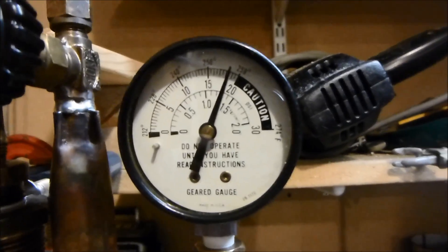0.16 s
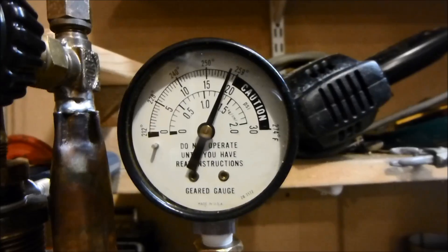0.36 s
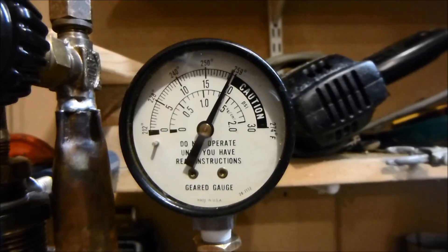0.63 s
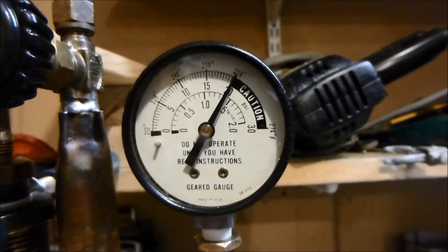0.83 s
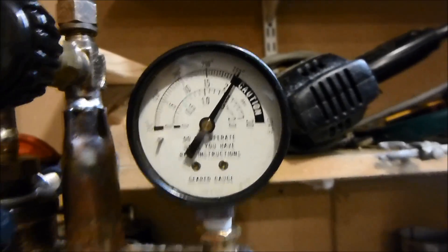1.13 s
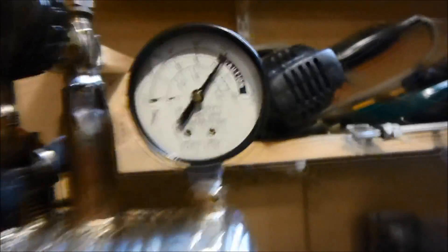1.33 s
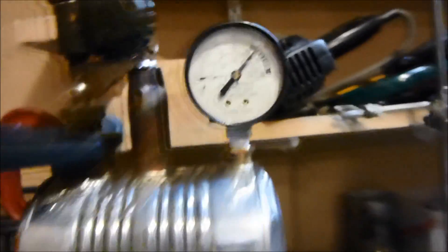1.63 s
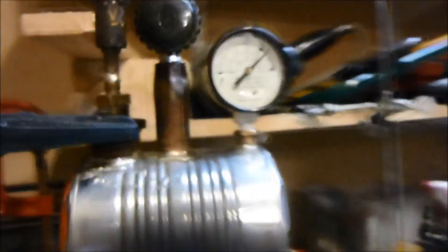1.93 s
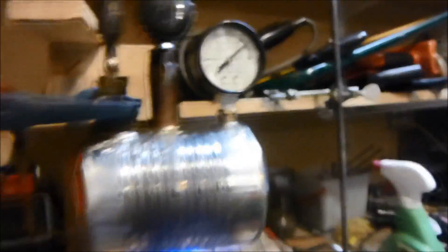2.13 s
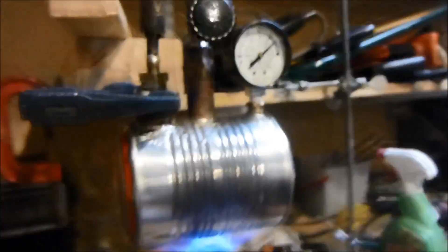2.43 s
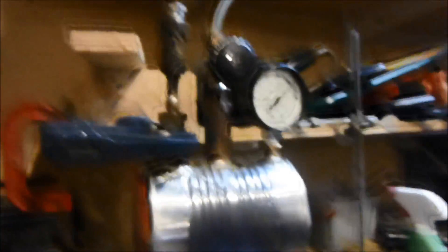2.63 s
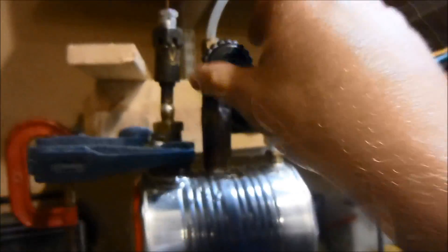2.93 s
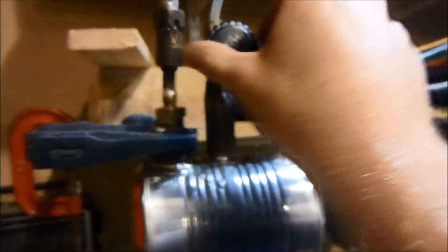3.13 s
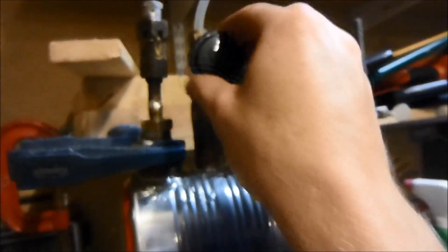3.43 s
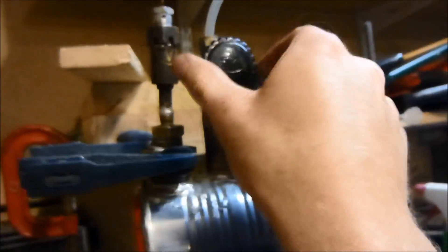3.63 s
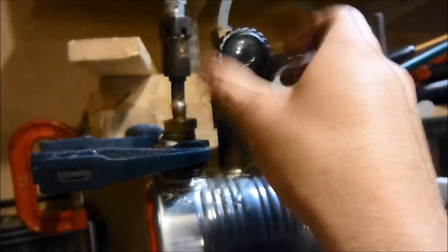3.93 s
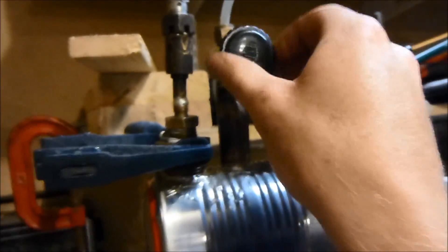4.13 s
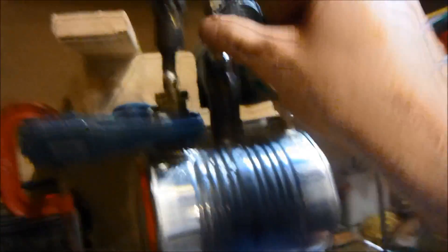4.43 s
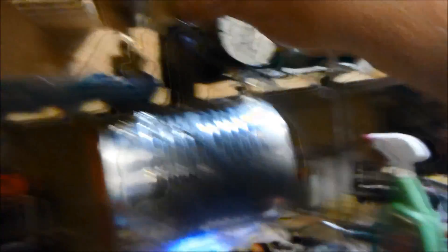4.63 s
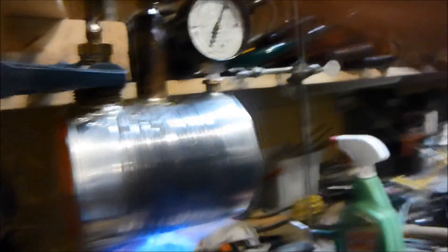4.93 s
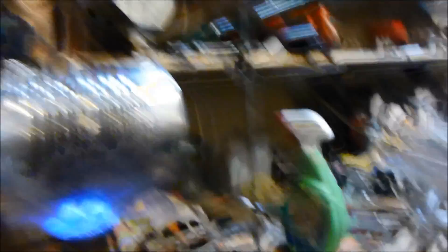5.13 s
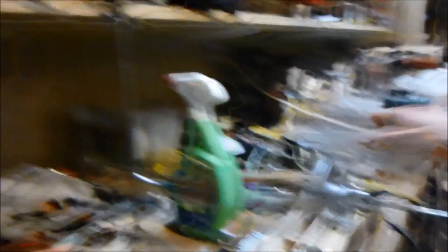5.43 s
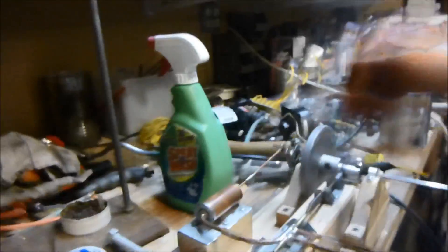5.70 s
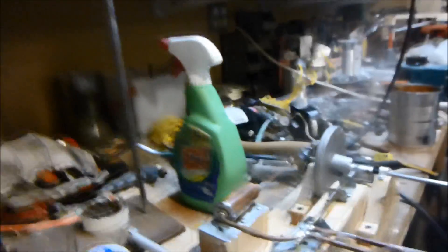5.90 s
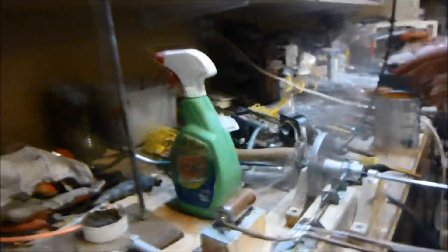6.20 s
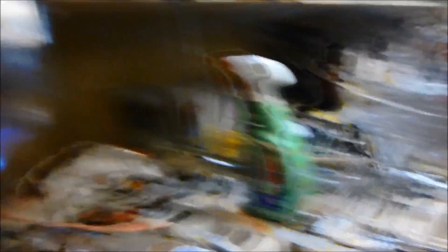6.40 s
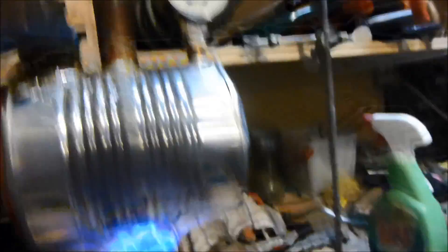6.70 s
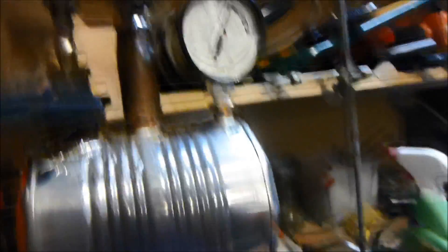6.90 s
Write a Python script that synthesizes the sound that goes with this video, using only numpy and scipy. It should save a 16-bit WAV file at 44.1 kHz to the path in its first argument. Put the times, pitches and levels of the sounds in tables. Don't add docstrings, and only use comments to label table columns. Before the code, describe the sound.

Close handheld stereo sound at a bench: the tail of a steam release stops with a sharp metallic snap. A gas flame hisses, flutters and pops, growing louder. A spring valve ticks, bursts open with bright wet steam, holds nearly a second, then shuts abruptly. After a quieter flame passage, leaking steam rises and a tiny piston engine chuffs, each turn with a breathy sliding whistle, ever faster.

```python
import sys
import numpy as np
from scipy import signal
from scipy.fft import rfft, irfft, next_fast_len
from scipy.io import wavfile
from scipy.ndimage import uniform_filter1d

SR = 44100
rng = np.random.default_rng(int(sys.argv[2]) if len(sys.argv) > 2 else 0)


def bounce(signal):
    frames = np.transpose(np.atleast_2d(signal))
    limited = np.clip(frames, -1, 1)
    pcm = np.round(limited * 32767).astype(np.int16)
    wavfile.write(sys.argv[1], SR, pcm)


def boost(x):
    u = np.asarray(x, float) / 20
    return 10 ** u


N = 311346
SIZE = next_fast_len(N)
HZ = np.arange(SIZE // 2 + 1) * SR / SIZE + 1e-3
TIME = np.arange(N) / SR

# (time [s], level [dB], left-right [dB], treble [dB])
HISS_CURVE = [(0.12, -42.5, 3.5, 5.5), (0.3, -42, 5, -5), (0.85, -38.5, 5.5, -1), (1.75, -36, 4, -1),
              (2.3, -35, 3.5, 5.5), (2.625, -29, 3, 2), (2.66, -41.5, -12, 6), (3.5, -41.5, -2, 10),
              (3.7, -46, 2.5, 1), (4.06, -42.5, 1, -1), (4.2, -40, 1, 2.5), (4.65, -37.5, 1.5, 0.5),
              (5.16, -38.5, 4, 4), (5.4, -39, 6, 6), (5.7, -39, 5, 6.5), (6.3, -40.5, 8, 0),
              (6.8, -34, 3, -2), (7.06, -35, 3, -20)]
# (frequency [Hz], density [dB per Hz])
HISS_SPECTRUM = [(650, -46), (1100, -26), (2020, -18.5), (2940, -11), (3430, -14.5), (4050, -8),
                 (4420, -10.5), (5220, 1.5), (6160, -1.5), (7270, -7), (10300, -14.5), (12900, -10),
                 (15400, -14)]
# (frequency [Hz], width [Hz], level [dB])
NOZZLE_BANDS = [(3007, 220, -28), (4107, 75, -22), (5154, 105, -11.5)]
# (frequency [Hz], width [Hz], level [dB])
WEEP_BANDS = [(6320, 220, -11), (8300, 500, -15.5), (12740, 550, -16.5)]
# (time [s], pitch factor [1], level [dB])
WEEP_CURVE = [(0.2, .92, -4), (1.0, .96, -3), (1.45, .95, -2), (1.65, 1.03, 2), (1.95, 1.06, 4),
              (2.3, .96, 3), (2.6, .94, 3), (3.7, .93, -7), (4.3, .96, -6), (4.8, 1.0, -3), (5.2, 1.05, 1),
              (5.6, 1.0, -4), (7.06, .98, -5)]
# (time [s], lag [ms], level [dB])
SHELL_ECHO_CURVE = [(1.3, 1.5, -30), (1.42, 1.35, -11), (1.8, .95, -11), (2.05, .88, -12), (2.4, 1.0, -30)]
# (time [s], gain [dB])
GAS_GUSTS = [(.22, 0.5), (0.35, 2.5), (0.43, 0.5), (0.58, 1.5), (0.7, 2), (0.88, -1), (1.0, 1), (1.08, 2),
             (1.25, 1), (1.33, 2), (1.45, 2.5), (1.56, 2), (1.7, 3.5), (1.77, 4), (2.0, 0), (4.2, 0.5),
             (4.5, 1), (4.8, -0.5), (5.16, 2.5)]
# (frequency [Hz], left-right likeness [1])
BURNER_STEREO = [(60, 0.4), (130, 0.9), (290, 0.93), (640, 0.63), (1410, 0.44), (3100, 0.58), (6820, 0.94),
                 (15000, 0.16)]
# (time [s], roar level [dB])
ROAR_CURVE = [(0.0, -60), (0.14, -58), (0.9, -52), (1.7, -51.5), (2.4, -45.5), (2.6, -43.5), (2.71, -50.5),
              (3.4, -49), (3.56, -57), (3.85, -54), (4.78, -52.5), (5.15, -45.5), (5.56, -46.5),
              (5.68, -45.5), (6.4, -42), (6.55, -45.5), (7.06, -41)]
# (frequency [Hz], density [dB per Hz])
ROAR_SPECTRUM = [(68, -73), (115, -5.5), (157, -3.5), (275, -1), (358, -2.5), (446, -14), (498, -6),
                 (550, -13), (922, -10.5), (1140, -14.5), (1600, -14.5), (2080, -17.5), (3520, -120)]
# (frequency [Hz], density [dB per Hz])
FLUTTER_SPECTRUM = [(45, -10), (70, -15), (100, 3), (125, 6), (180, -43)]
# (time [s], peak [dB], brightness [dB])
IGNITIONS = [(0.137, -38.5, -4), (0.225, -48, -1), (0.299, -37, -10.5), (0.537, -32, -8), (0.655, -44, -17),
             (0.699, -35.5, -20), (0.751, -30, -7), (0.831, -33.5, -10), (0.876, -33.5, -8),
             (0.909, -34, -10), (0.97, -36, -24), (1.038, -38, -19), (1.11, -35, -7.5), (1.182, -29.5, -13),
             (1.285, -31, -13), (1.33, -35, -10), (1.393, -37, -7), (1.493, -22.5, -10), (1.55, -36, -5),
             (1.65, -31.5, -1), (1.71, -23, -9), (1.81, -45, 1), (1.942, -42, -16), (2.019, -52, -14),
             (2.081, -28, -9.5), (2.156, -25.5, -3.5), (2.219, -29, -6.5), (2.39, -42, 0),
             (2.482, -26, -8.5), (2.533, -30.5, -2.5), (2.627, -40, -2), (2.79, -42, -2), (3.114, -32.5, 0),
             (3.528, -30.5, -13), (3.818, -34, -13), (3.887, -34, -7), (4.141, -42.5, -1.5),
             (4.356, -37, -18), (4.51, -31, -14), (4.71, -40, -11), (4.841, -39, -1), (4.968, -24, -10.5),
             (5.06, -35, -3), (5.169, -23, -20), (5.301, -26.5, -13), (5.428, -30, -9), (5.501, -33.5, -13),
             (5.57, -34, -15), (5.65, -28.5, -11), (5.847, -30.5, -6), (5.912, -37, -14), (5.964, -42, -17),
             (6.176, -24, -9.5), (6.341, -33, -21), (6.446, -21, -21), (6.574, -40, -8), (6.791, -36, -6),
             (6.936, -40, 0), (6.988, -37, -19)]
# (time [s], peak [dB], brightness [dB])
OPENING_POP = (0.00094, -29, -30)
# (frequency [Hz], width [Hz], level [dB])
FIREBOX_MODES = [
    [(164, 116, -5), (276, 93, 0)],
    [(620, 118, -4.5), (920, 220, -7)],
]

# (time [s], jet level [dB])
VALVE_OPENING = [
    (1.702, -66),
    (2.29, -41),
    (2.33, -34),
    (2.5, -35),
    (2.627, -26),
    (2.636, -19.5),
    (2.65, -21),
]
# (time [s], jet level [dB])
VALVE_BLOWING = [(2.69, -24.5), (2.808, -22.5), (2.862, -22), (2.918, -21.5), (2.954, -21), (2.966, -25),
                 (3.048, -22), (3.106, -23.5), (3.178, -21), (3.284, -23), (3.34, -22), (3.456, -22),
                 (3.504, -22)]
# (time [s], jet level before [dB])
VALVE_SHUTTING = [
    (0.026, -22.5),
    (3.542, -21),
]
# (frequency [Hz], density [dB per Hz])
JET_SPECTRUM = [(180, -51), (300, -20), (1030, -16.5), (2100, -21), (2900, -20.5), (3500, -16.5),
                (3900, -12), (4150, -12.5), (4450, -14.5), (4950, -4.5), (5950, -5), (7450, -13.5),
                (14200, -1.5), (15000, -1), (15500, -10)]
# (frequency [Hz], left-right likeness [1])
JET_STEREO = [(60, 0.54), (130, 0.94), (290, 0.19), (640, -0.18), (1410, -0.53), (3100, 0.54), (6820, 0.89),
              (15000, 0.71)]
# (time [s], frequency [Hz], level over jet [dB])
SHRIEK_CURVE = [(2.64, 12800, -6), (2.8, 13000, -14), (2.94, 13000, -3), (2.98, 14500, -19),
                (3.2, 14600, -10), (3.55, 13860, -18)]
# (time [s], peak [dB])
SEAT_HITS = [
    (0.0044, -6.5),
    (0.0202, -14),
    (.716, -26),
    (2.342, -15),
    (2.6298, -5),
    (2.633, -9),
    (2.637, -6.5),
    (2.644, -10),
    (2.654, -10),
    (2.7978, -11),
]
# (frequency [Hz], density [dB per Hz])
SLAM_SPECTRUM = [(60, -45), (130, 1), (300, -15), (900, -15), (2000, -16), (3300, -10.5), (5500, 0),
                 (8000, -7), (13500, -0.5), (15000, 3), (16000, -10)]
# (time [s], low mode [dB], high mode [dB])
DISC_BOUNCES = [
    (3.5306, -23, -22),
    (3.533, -16.5, -31),
    (3.5397, -18, -15),
]
# (time [s], depth [dB])
NOTCH_DEPTH = [(2.66, 0), (2.72, 11), (2.9, 21), (3.55, 24), (3.65, 4), (5.0, 3), (5.6, 0)]

# (time [s], valve gear leak [dB], steady exhaust [dB])
ENGINE_CURVE = [(4.1, -47, -75), (4.9, -41.5, -75), (5.2, -45, -75), (5.32, -43, -66), (5.44, -41, -68),
                (5.5, -35, -65), (5.69, -31, -59), (5.73, -29.5, -47), (5.82, -31.5, -42),
                (6.0, -32.5, -49), (6.15, -32, -39.5), (6.5, -37, -39), (7.06, -81, -36)]
# (frequency [Hz], density [dB per Hz])
EXHAUST_SPECTRUM = [(530, -30), (900, -11), (1570, -5.5), (1880, -8.5), (2170, -8.5), (3290, -9.5),
                    (4070, -3.5), (4420, -10.5), (5480, 0), (8200, -3.5), (13700, -2), (15400, -5)]
# (frequency [Hz], density [dB per Hz])
LEAK_SPECTRUM = [(1470, -53), (2500, -15.5), (4070, -8), (4630, -3.5), (5230, -5), (6570, -7), (13200, 4.5),
                 (15400, -0.5)]
# (frequency [Hz], left-right likeness [1])
ENGINE_STEREO = [(60, 0.71), (130, 0.91), (290, 0.91), (640, 0.79), (1410, 0.66), (3100, 0.22), (6820, 0.6),
                 (15000, 0.64)]
# (exhaust opens [s], puff [dB], whistle [dB])
EXHAUST_TURNS = [
    (5.708, -30, -43.5),
    (6.151, -28.5, -42),
    (6.328, -29, -42),
    (6.465, -29, -52),
    (6.588, -29, -42.5),
    (6.697, -30, -43),
    (6.806, -29.5, -41),
    (6.907, -32, -48),
    (7.003, -34, -50),
]
# (time [s], crank angle [turns])
FIRST_TURN_CRANK = [(5.708, .2), (5.76, .33), (5.83, .38), (5.875, .47), (6.0, 0.55), (6.04, .64),
                    (6.066, .67), (6.085, .74), (6.105, .78)]
PISTON_SWEEP = [(.5, .5), (.57, .57), (.71, .78)]
# (crank angle [turns], level [dB])
FIRST_STROKE_SONG = [(.2, -5), (.33, 1), (.44, 1), (.5, 2), (.54, -6), (.62, 1), (.68, 1), (.8, -4),
                     (1, -3), (1.2, 0), (2, -1), (2.2, 1)]

# (frequency [Hz], density [dB per Hz])
RUMBLE_SPECTRUM = [(12, -30), (20, 8), (25, -11), (32, -24), (48, -25), (64, -26), (83, -52), (140, -120)]


def rms_one(x):
    return x / np.sqrt(np.mean(x ** 2) + 1e-20)


def in_time(rows):
    s, *columns = np.transpose(rows)
    return [np.interp(TIME, s, c) for c in columns]


def at_hz(points, hz):
    table_hz, value = np.transpose(points)
    return np.interp(np.log(hz), np.log(table_hz), value)


def drift(rate_hz):
    r = np.exp(-16 * np.pi * rate_hz / SR)
    slow = signal.lfilter([1], [1, -2 * r, r * r], rng.standard_normal(N // 8 + 9002))[9000:]
    return np.interp(np.arange(N) / 8, np.arange(len(slow)), rms_one(slow))


def bursts(times_s, levels_db, rise_s, t60_s):
    out = np.zeros(N)
    for s, db, long_s in zip(times_s, levels_db, np.broadcast_to(t60_s, len(times_s))):
        span = slice(round(s * SR), round((s + long_s) * SR))
        age_s = TIME[span] - s
        out[span] += boost(db - 60 * age_s / long_s) * np.clip(age_s / rise_s, 0, 1)
    return out


def resonate(x, modes):
    out = 0
    for k, (hz, width_hz, db) in enumerate(modes):
        r = np.exp(-np.pi * width_hz / SR)
        poles = [1, -2 * r * np.cos(2 * np.pi * hz / SR), r * r]
        out = out + (-1) ** k * boost(db) * signal.lfilter([1 - r * r, 0, r * r - 1], poles, x + 1e-18)
    return out


def filtered(x, order, hz, kind):
    return signal.sosfilt(signal.butter(order, hz, kind, fs=SR, output="sos"), x)


def narrow_noise(centre_hz, width_hz, steady=0):
    breath = drift(width_hz) + 1j * drift(width_hz)
    breath = breath * (np.sqrt(2) / np.abs(breath)) ** steady
    return np.real(breath * np.exp(2j * np.pi * np.cumsum(centre_hz) / SR))


def turbulence(spectrum, likeness, surge_db, patchy_db, spit_db, ref_hz, lag_s=0):
    grain = boost(surge_db * (drift(3.4) + 0.52 * drift(28)) + spit_db * drift(450))
    mid, side = rfft(rng.standard_normal((2, SIZE))[:, :N] * grain, SIZE)
    alike = np.clip(at_hz(likeness, HZ), -1, 1)
    pair = np.sqrt(1 + alike) * mid + np.sqrt(1 - alike) * side * [[1], [-1]]
    pair = pair * boost(at_hz(spectrum, HZ)) * np.exp(1j * np.pi * HZ * lag_s * np.array([[1], [-1]]))
    lags_s = .002 + .012 * rng.random(6)
    pair = pair * (1 + boost(-15) * sum(np.exp(-2j * np.pi * HZ * lag) for lag in lags_s))
    inside = (HZ > ref_hz[0]) & (HZ < ref_hz[1])
    power = np.sum(np.abs(pair.mean(axis=0)[inside]) ** 2)
    pair = pair * SIZE / np.sqrt(2 * SIZE / N * power)
    half_octave = 2 * np.log2(HZ)
    lowest, highest = np.floor(2 * np.log2(spectrum[0][0])), 2 * np.log2(spectrum[-1][0])
    out, near = 0, drift(2)
    for centre in np.arange(lowest, highest + 1):
        share = np.clip(1 - np.abs(half_octave - centre), 0, 1)
        near = .7 * near + .7 * drift(2)
        out = out + boost(patchy_db * (near + drift(18.6))) * irfft(pair * share, SIZE)[:, :N]
    return out


def panned(x, pan_db):
    return x * boost(np.array([[.5], [-.5]]) * pan_db)


def gas_hiss():
    level_db, pan_db, treble_db = in_time(HISS_CURVE)
    hiss = turbulence(HISS_SPECTRUM, BURNER_STEREO, surge_db=1.1, patchy_db=.5, spit_db=0.0,
                      ref_hz=(4500, 7000), lag_s=5e-6)
    band_hz = np.where(TIME < 5.3, 5960, 5580) * (1 + 0.017 * drift(1.4))
    hiss = hiss + boost(-12.5 + 2 * drift(4.9)) * narrow_noise(band_hz, width_hz=96)
    for hz, width_hz, db in NOZZLE_BANDS:
        hiss = hiss + boost(db + 2.0 * drift(4.0)) * narrow_noise(hz * (1 + .018 * drift(.7)), width_hz)
    factor, weep_db = in_time(WEEP_CURVE)
    for hz, width_hz, db in WEEP_BANDS:
        hiss = hiss + boost(db + weep_db) * narrow_noise(hz * factor, width_hz)
    treble = signal.sosfiltfilt(signal.butter(3, 8500, "high", fs=SR, output="sos"), hiss)
    hiss = hiss + (boost(treble_db) - 1) * treble
    lag_ms, echo_db = in_time(SHELL_ECHO_CURVE)
    echo = np.array([np.interp(TIME - lag_ms / 1000, TIME, ear) for ear in hiss])
    hiss = (hiss + boost(echo_db) * echo) / np.sqrt(1 + boost(2 * echo_db))
    gust_s = 0.025
    level_db = level_db + sum(db * np.exp(-.5 * ((TIME - s) / gust_s) ** 2) for s, db in GAS_GUSTS)
    return panned(boost(level_db) * hiss, pan_db)


def late_ignitions(roar_db):
    luck = rng.random((120, 3))
    small_s = np.cumsum(.11 * (0.22 + 1.4 * luck[:, 0]))
    small_db = np.interp(small_s, TIME, roar_db) + 11.5 - 9.0 * luck[:, 1]
    small = np.c_[small_s, small_db, -2.5 - 13 * luck[:, 2]]
    return np.vstack([[OPENING_POP], IGNITIONS, small[small_s < TIME[-1]]]).T


def flame_roar(roar_db, pops):
    s, peak_db, bright_db = pops
    blowing = (TIME > VALVE_OPENING[-1][0] + .02) & (TIME < VALVE_SHUTTING[-1][0])
    choke_db = -23 * uniform_filter1d(1. * blowing, size=4000)
    mean_db = roar_db.mean()
    flutter_db = mean_db + 0.31 * (roar_db - mean_db) - 17.5 + 3.5 * drift(9.9) + choke_db
    roar = turbulence(ROAR_SPECTRUM, BURNER_STEREO, surge_db=2.5, patchy_db=1.0, spit_db=2.0, ref_hz=(120, 450))
    flutter = turbulence(FLUTTER_SPECTRUM, BURNER_STEREO, surge_db=2.0, patchy_db=-1.0, spit_db=3.5,
                         ref_hz=(60, 115))
    thumps = bursts(s, peak_db + bright_db - 22.5, rise_s=0.0099, t60_s=.14)
    return boost(roar_db) * roar + (boost(flutter_db) + thumps * ~blowing) * flutter


def flame_pops(pops):
    s, peak_db, bright_db = pops
    puff = rng.standard_normal(N) + 0.31 * rng.standard_normal((2, N))
    puff = filtered(puff, 2, 110, "high")
    dull_modes, bright_modes = FIREBOX_MODES
    dull = resonate(puff * bursts(s, peak_db + 10.5, rise_s=0.0051, t60_s=.08), dull_modes)
    bright_puff = puff * bursts(s, peak_db + bright_db + 13.5, rise_s=0.0061, t60_s=.1144)
    return dull + resonate(bright_puff, bright_modes)


def burner():
    roar_db, = in_time(ROAR_CURVE)
    pops = late_ignitions(roar_db)
    return gas_hiss() + flame_roar(roar_db, pops) + flame_pops(pops)


def snap(s, db):
    return [(s, db), (s + .029, db - 20.5), (s + .094, db - 27), (s + .14, -75)]


def steam_jet():
    first_shut, last_shut = VALVE_SHUTTING
    jet_db, = in_time(snap(*first_shut) + VALVE_OPENING + VALVE_BLOWING + snap(*last_shut))
    drops = (rng.random(N) < 120 / SR) * np.minimum(rng.exponential(.7, N), 1.6)
    drop_t60_s = 0.00057
    flow = boost(jet_db) * (1 + signal.lfilter([1], [1, -boost(-60 / (drop_t60_s * SR))], drops))
    jet = flow * turbulence(JET_SPECTRUM, JET_STEREO, surge_db=.5, patchy_db=0.35, spit_db=1.64,
                            ref_hz=(8500, 15500), lag_s=5e-6)
    jet = filtered(jet, 4, 220, "high")
    shriek_hz, shriek_db = in_time(SHRIEK_CURVE)
    shrieking = TIME > SHRIEK_CURVE[0][0]
    return jet + flow * boost(shriek_db) * shrieking * narrow_noise(shriek_hz, width_hz=510)


def valve_disc():
    s, peak_db = np.transpose(SEAT_HITS)
    slam = turbulence(SLAM_SPECTRUM, JET_STEREO, surge_db=0, patchy_db=0, spit_db=0, ref_hz=(3000, 15500))
    out = slam * bursts(s, peak_db - 8.0, rise_s=0.00039, t60_s=0.025)
    disc_hz, disc_t60_s = (5530, 13900), 0.022
    for s, *modes_db in DISC_BOUNCES:
        span = slice(round(s * SR), round((s + .01) * SR))
        age_s = np.clip(TIME[span] - s, 0, None)
        for hz, db in zip(disc_hz, modes_db):
            out[:, span] += boost(db - 60 * age_s / disc_t60_s) * np.sin(2 * np.pi * hz * age_s)
    return out


def shop_echo(x):
    t60_s = 0.24
    age_s = np.arange(round(t60_s * SR)) / SR
    echo = rng.standard_normal((2, len(age_s))) * boost(-60 * age_s / t60_s) * (age_s > .006)
    echo = filtered(echo, 2, 4600, "low")
    echo = boost(-28) * rms_one(echo) / np.sqrt(len(age_s))
    return signal.fftconvolve(x, echo, axes=1)[:, :N]


def relief_valve():
    valve = steam_jet() + valve_disc()
    return panned(valve, 2.5 - 0.5 * drift(5.4)) + shop_echo(valve)


def hollowed(x):
    depth_db, = in_time(NOTCH_DEPTH)
    spectrum, out = rfft(x, SIZE), x
    for k in range(14):
        share = np.clip(1 - np.abs((HZ - 2050) / 120 - k), 0, 1)
        deeper = .25 + .9 * (k % 11 == 1) + .5 * (k == 2)
        loss = 1 - boost(-depth_db * np.clip(drift(13) + deeper, 0, 2))
        out = out - loss * irfft(spectrum * share, SIZE)[:, :N]
    return out


def engine_steam(s, puff_db, turn_s):
    leak_db, exhaust_db = in_time(ENGINE_CURVE)
    flow = boost(exhaust_db) + bursts(s, puff_db - 3.0, rise_s=.005, t60_s=2.2 * turn_s)
    jet = dict(surge_db=.25, patchy_db=.35, spit_db=1.5, ref_hz=(8500, 15500))
    exhaust = flow * turbulence(EXHAUST_SPECTRUM, ENGINE_STEREO, **jet)
    return exhaust + boost(leak_db) * turbulence(LEAK_SPECTRUM, ENGINE_STEREO, **jet)


def crank_angle(s, turn_s):
    rows = list(FIRST_TURN_CRANK)
    for k in range(1, len(s)):
        rows.append((s[k], k))
        rows += [(s[k] + share * turn_s[k], k + turns) for share, turns in PISTON_SWEEP]
    turn, = in_time(rows)
    return turn


def cylinder_whistle(s, whistle_db, turn_s):
    longest_s = s + 0.5 * turn_s
    speeding = np.clip(np.arange(len(s)) / 7, 0, 1)
    longest_hz = 2126 + (2415 - 2126) * speeding
    turn = crank_angle(s, turn_s)
    shortening = .5 + .5 * np.cos(2 * np.pi * turn)
    pitch_hz = np.interp(TIME, longest_s, longest_hz) / (1 - .8 * shortening)
    open_port = np.clip((turn % 1 - .41) / 0.05, 0, 1) * np.clip((.86 - turn % 1) / 0.08, 0, 1)
    open_port = np.maximum(open_port, .75 * (turn > .28) * (turn < .6))
    broad = narrow_noise(pitch_hz, width_hz=290, steady=.6)
    narrow = narrow_noise(pitch_hz, width_hz=80, steady=0.42)
    whistle = np.where(shortening < .04, narrow, broad)
    level_db = np.interp(TIME, longest_s, whistle_db) + 2.0 * drift(40) + 8 * shortening
    level_db = level_db + np.interp(turn, *np.transpose(FIRST_STROKE_SONG))
    return boost(level_db) * open_port * whistle


def engine():
    s, puff_db, whistle_db = np.transpose(EXHAUST_TURNS)
    turn_s = np.append(np.diff(s), .095)
    return engine_steam(s, puff_db, turn_s) + cylinder_whistle(s, whistle_db, turn_s)


def low_rumble():
    return boost(-78) * turbulence(RUMBLE_SPECTRUM, [(20, .1), (100, .7)], surge_db=1.0, patchy_db=4.5,
                                 spit_db=3, ref_hz=(20, 64))


def scene():
    return hollowed(burner() + relief_valve()) + engine() + low_rumble()


def top_cut(x):
    return signal.sosfilt(signal.butter(12, 16000, fs=SR, output="sos"), x)


def record(dry):
    cut = signal.sosfilt(signal.cheby2(20, 55, 15760, fs=SR, output="sos"), dry)
    return top_cut(cut - .0031)


dry = scene()
out = record(dry)
bounce(out)
```